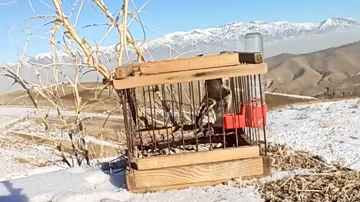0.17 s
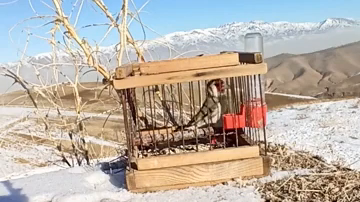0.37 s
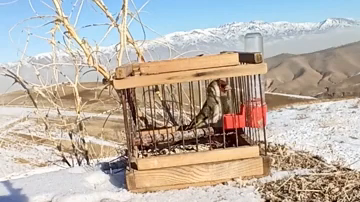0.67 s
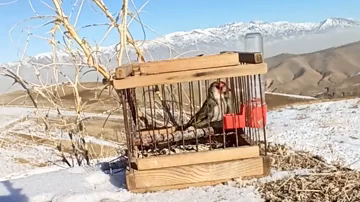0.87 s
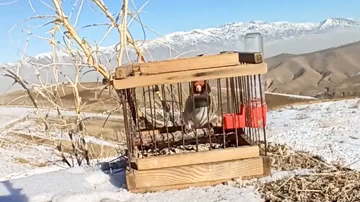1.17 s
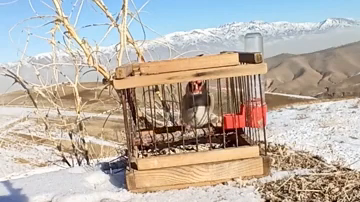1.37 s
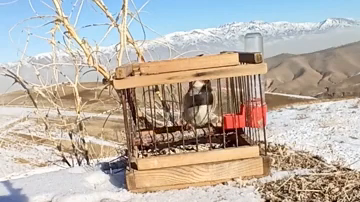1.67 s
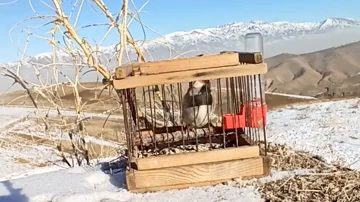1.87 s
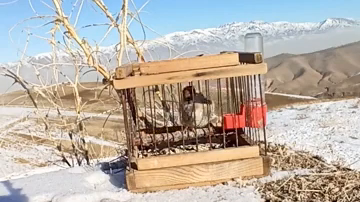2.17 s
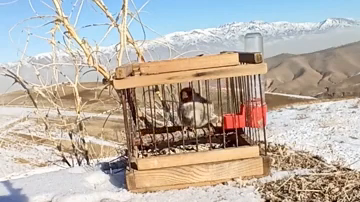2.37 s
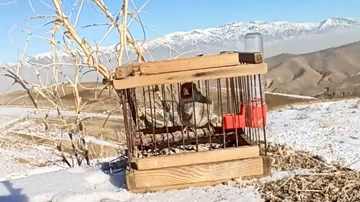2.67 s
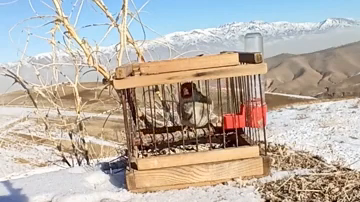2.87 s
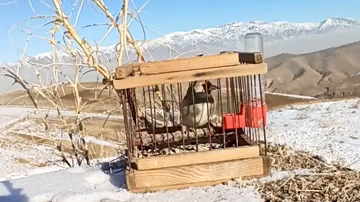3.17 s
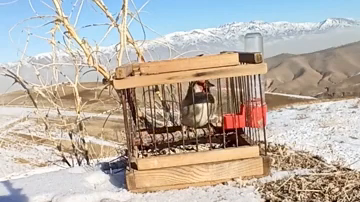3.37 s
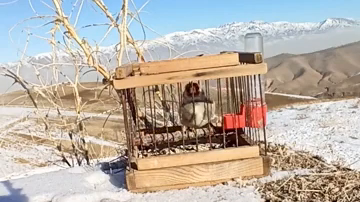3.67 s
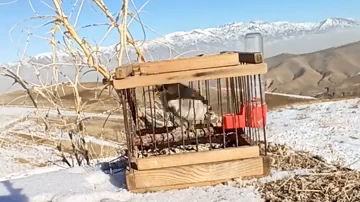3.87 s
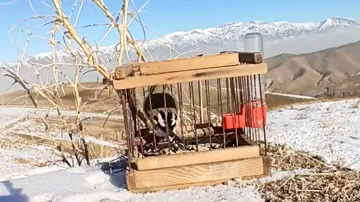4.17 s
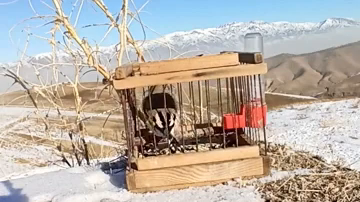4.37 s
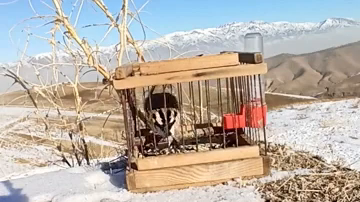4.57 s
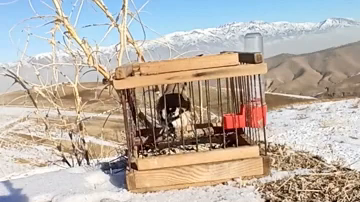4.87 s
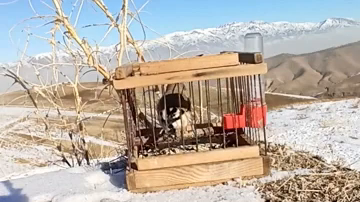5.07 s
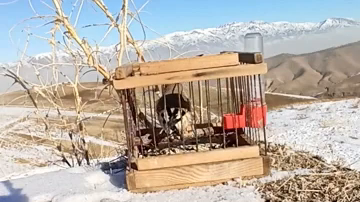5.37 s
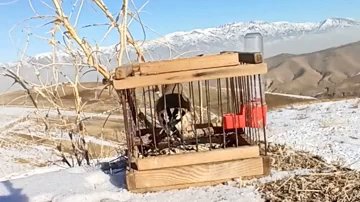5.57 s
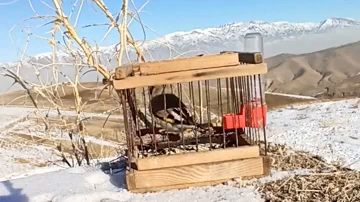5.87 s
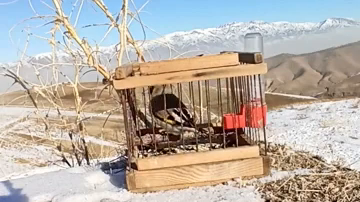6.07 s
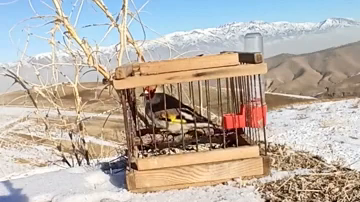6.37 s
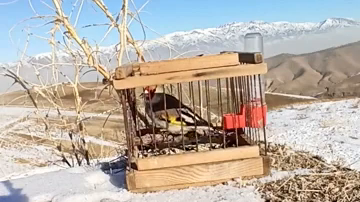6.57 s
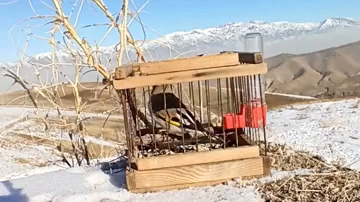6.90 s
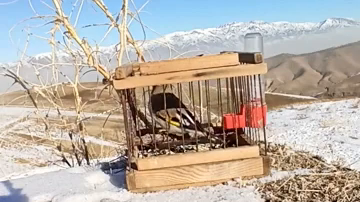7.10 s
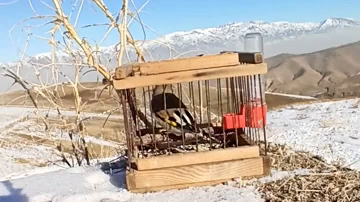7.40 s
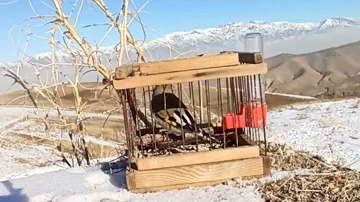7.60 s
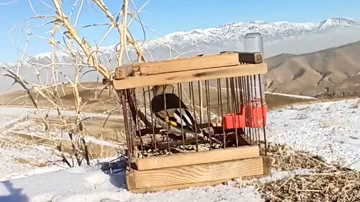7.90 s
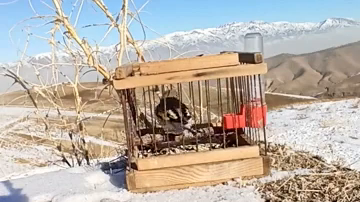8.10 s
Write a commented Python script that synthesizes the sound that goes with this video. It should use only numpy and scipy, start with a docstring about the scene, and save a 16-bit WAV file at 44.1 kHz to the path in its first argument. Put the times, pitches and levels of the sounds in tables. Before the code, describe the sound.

A small caged goldfinch gives sharp, high, falling chirps in twos and threes outdoors, with faint wire ticks, a perch thump and late wind buffets.

```python
"""A wire ticks over a low rumble and hiss: a goldfinch hops in a small wooden cage on a snowy hillside.
It chirps in twos and threes, left of a stereo microphone: both halves of its syrinx whistle at once, falling,
and couple into sum and difference tones. Wire, wood and perch sound as struck, decaying modes; feathers rustle
as band-limited noise. Far birds call faintly as gliding sines; at the end wind buffets the left port."""
import sys
import numpy as np
from scipy import signal
from scipy.fft import rfft, irfft
from scipy.io import wavfile
from scipy.ndimage import uniform_filter1d

SR = 44100
rng = np.random.default_rng(int(sys.argv[2]) if len(sys.argv) > 2 else 0)


def dump(signal):
    """Clip the signal to [-1, 1] and save it as 16-bit WAV at the path in sys.argv[1]."""
    limited = np.clip(np.atleast_2d(signal).T, -1, 1)
    pcm = np.round(limited * 32767).astype(np.int16)
    wavfile.write(sys.argv[1], SR, pcm)


N = 363384
T = np.arange(N) / SR

# Spectrum of the distant rumble: pitch_hz, relative_db (per Hz)
RUMBLE_SPECTRUM = [(18, -64), (30, -33), (97, 0.5), (321, -9), (395, -10.5), (806, -17), (896, -16.5),
                   (995, -20.5), (4500, -30.5), (5850, -60), (9900, -120)]
# Spectrum of the hiss: pitch_hz, relative_db
HISS_SPECTRUM = [(2500, -28.5), (4500, -5), (4700, -3.5), (4850, -10), (6000, -4.5), (6200, 0.5),
                 (7600, -2), (7750, -7.5), (8500, -7.5), (8750, -0.5), (11400, 2.5), (11700, -2),
                 (15400, -4.5)]
# Likeness of the background noise in left and right, by pitch: pitch_hz, correlation (0-1)
NOISE_CORRELATION = [(60, .38), (290, .22), (640, .02), (6500, .05), (7200, .9), (8500, 0.99)]
RUMBLE_DB, HISS_DB = -62, -72  # rms ahead of the rumble's wander and the final tone colour

# Course of the wind on the ports: time_s, left_db, right_db
WIND_COURSE = [(6.4, -77.5, -87), (6.9, -58.5, -79.5), (7.3, -57.5, -80), (7.45, -51.5, -75),
               (7.7, -53, -62.5), (7.95, -52.5, -66.5), (8.1, -56, -71.5), (8.24, -56.5, -66)]
# Single buffets on the left port: time_s, relative_db, pitch_hz
WIND_BUFFETS = [(7.401, -48.5, 102), (7.459, -46, 84), (7.539, -44.5, 88.8), (7.679, -44.5, 102),
                (7.759, -44.5, 121), (7.81, -47.5, 86.1), (7.999, -40, 94.8)]
# Far whistles: start_s, length_s, start_hz, end_hz, relative_db, left_minus_right_db
FAR_WHISTLES = [(2.871, 0.059, 2860, 4900, -73.5, 7), (3.582, .02, 2950, 3380, -75, 2),
                (3.713, .024, 3400, 3780, -69.5, 3), (3.715, 0.024, 3850, 4600, -73, 3),
                (3.81, .034, 3000, 3780, -71.5, 7), (0.306, 0.025, 3140, 3260, -70, 13),
                (0.38, 0.024, 3170, 3206, -72.5, 2), (6.513, .022, 3130, 3250, -77, 4)]

# Modes of a struck wire: pitch_ratio, relative_db, t60_s
WIRE_MODES = [(1, 0, .035), (.9, -15, .02), (1.03, -6, .03)]
# Modes of the wooden frame: pitch_hz, relative_db, t60_s
WOOD_MODES = [(380, 0, 0.045), (620, 6, .045), (940, 1.5, 0.012), (1250, 3.5, 0.027), (1550, 0.5, .025),
              (1950, -4.5, 0.078), (3020, -12.5, .03)]
# Claws and tail tick the wires: time_s, wire_db, wire_hz, frame_knock_db (relative strengths)
WIRE_TICKS = [(0.004, -42.5, 6830, -53), (0.216, -50, 7500, -54.5), (0.232, -58, 7600, -57.5),
              (0.295, -46, 7500, -64), (0.315, -50, 7640, -57), (0.337, -44, 6480, -51.5),
              (0.34, -55, 7420, -51.5), (0.361, -64.5, 7400, -63.5), (1.003, -42, 7470, -71),
              (1.220, -55, 7650, -60), (1.849, -56.5, 6940, -65.5), (3.848, -61.5, 7000, -58),
              (4.097, -45, 6840, -59), (4.149, -65, 7650, -54)]
# Feet land on the perch: time_s, frame_knock_db, perch_ring_db (relative strengths)
PERCH_LANDINGS = [(1.234, -58, -50.5), (4.008, -40.5, -38.5), (4.020, -48.5, -45.5), (4.030, -47.5, -42),
                  (4.125, -52.5, -70), (4.659, -61.5, -54.5)]
# Feathers brush the wires: start_s, length_s, relative_db
FEATHER_RUSTLES = [(0.23, 0.23, -69.5), (1.125, 0.19, -71.5), (4.1, 0.073, -66.5)]
PERCH_HZ, PERCH_T60_S = 801, 0.085
SCUFF_DB, SCUFF_T60_S = -4.5, 0.04
RUSTLE_EDGE_S = 0.02

# Coupling tones at m x lower + n x upper voice: m, n (whole numbers)
COUPLING_ORDERS = [(-1, 1), (-2, 2), (2, -1), (-1, 2), (2, 0), (1, 1), (0, 2), (3, 0), (3, -1), (-1, 3)]
# Strength of each coupling tone under the voices: relative_db
COUPLING_LEVELS = [-46.5, -48, -30, -35, -38, -34.5, -37, -40, -47.5, -42]
# The chirps: start_s, lower_length_s, upper_length_s,
# lower_start_hz, lower_rest_hz, upper_start_hz, upper_rest_hz, lower_top_db, upper_top_db (relative),
# lower_top_place, upper_top_place (0-1 of the note),
# cancelled_hz (one pitch that the cage reflection weakens), spacing_hz (of such pitches), reflection_share (0-1),
# lower_left_minus_right_db, upper_left_minus_right_db,
# difference_extra_db (low difference tone), sum_extra_db (high sum tones)
SONG = [(0.3972, 0.042, 0.042, 7170, 5326, 8320, 6760, -18, -22.5, 0.52, 0.43, 5983, 730, 0.14, 14.8, 10.6, 7, 8.5),
        (0.5406, 0.046, 0.05, 6150, 4770, 7330, 5850, -26, -22.5, 0.5, 0.45, 5770, 1330, 0.29, 11.6, 10.2, 11, 5.5),
        (1.2604, 0.043, 0.044, 7090, 5314, 8460, 6800, -16.5, -20, 0.55, 0.48, 6090, 753, 0.36, 12.1, 16.8, 7, -2),
        (1.4014, 0.048, 0.05, 5800, 4835, 7130, 5900, -22, -17.5, 0.37, 0.35, 5628, 464, 0.1, 8.7, 12.5, 5.5, 0.5),
        (2.0702, 0.047, 0.044, 7440, 5320, 8530, 6790, -11, -12.5, 0.43, 0.47, 5830, 1080, 0.23, 7.1, 18.1, -4, -3.5),
        (2.1901, 0.047, 0.053, 5950, 4820, 7200, 5985, -14.5, -15.5, 0.41, 0.32, 5710, 470, 0.12, 10.1, 8.7, 0.5, 3.4),
        (2.8214, 0.043, 0.048, 7240, 5320, 8390, 6830, -15, -18, 0.44, 0.39, 5780, 1114, 0.46, 12.5, 10.6, 1.5, -3),
        (3.0103, 0.044, 0.051, 5450, 4835, 6810, 6005, -18, -14.5, 0.42, 0.49, 5680, 470, 0.32, 9.9, 13.4, -7.5, -0.5),
        (3.1678, 0.05, 0.055, 5820, 4800, 7100, 6056, -20, -20, 0.41, 0.31, 6040, 480, 0.15, 13.6, 5, -7, 4.0),
        (3.8549, 0.044, 0.041, 7250, 5510, 8640, 6930, -11.5, -15.5, 0.35, 0.52, 5940, 670, 0.49, 13.1, 11.9, 5.0, 2.5),
        (3.9792, 0.053, 0.046, 6200, 4876, 7264, 6090, -21.5, -16, 0.43, 0.32, 5860, 635, 0.32, 8.9, 6.0, 6, -2.3),
        (4.167, 0.051, 0.048, 5620, 4770, 6990, 6060, -21.5, -21.85, 0.34, 0.32, 5420, 1266, 0.65, 10.4, 7.1, -1.6, -0.7),
        (5.7972, 0.041, 0.04, 6590, 5215, 8120, 6840, -19.5, -23.5, 0.36, 0.46, 5960, 717, 0.24, 14.0, 10.5, 0.5, -6),
        (5.9235, 0.047, 0.052, 5940, 4785, 7280, 5880, -26.5, -18, 0.42, 0.42, 6260, 846, 0.32, 11.0, 8.1, -1, -1.5),
        (6.5939, 0.052, 0.045, 7240, 5416, 8405, 6890, -14, -13.5, 0.26, 0.46, 5960, 978, 0.25, 9.3, 10.0, 3.5, 0),
        (6.7096, 0.052, 0.055, 6240, 4858, 7340, 6050, -20, -21, 0.52, 0.37, 6390, 865, 0.46, 10.2, 8.3, 3, -8)]
COUPLING_FLUTTER_DB, COUPLING_GROWTH = 3, 0.12  # louder notes couple more strongly
WAVER_DB = 0.8  # each voice is a little unsteady
SOFT_NOISE_DB, SIZZLE_DB = -53.5, -50  # rms ahead of the chirp's envelope
RASP_DB, RASP_HZ = -29.5, 900
OPENING_ABOVE_HZ = 6400  # a chirp whose lower voice starts above this opens a group
OPENING_LAG_S, TRAILING_LAG_S = 0.0035, 0.0017  # the upper voice joins this much later
GLIDE_S, TRAILING_UPPER_GLIDE_S = 0.014, 0.027  # time constants of the falling pitch
END_LIFT_HZ, SWELL_SHARPNESS = 108, 2.6
REFLECTION_RIGHT = 0.7  # share of the reflection that reaches the right port
LAG_S, SHADOW_LAG_S, SHADOW_SHARE = 0.00012, 0.0011, 0.28

ECHO_DB, ECHO_T60_S = -30, 0.052
# Final tone colour: pitch_hz, gain_db
TONE_COLOUR = [(8500, 0.5), (8750, -14.5), (11400, -15.5), (11700, -1), (13000, -0.5), (15300, 5.5)]
TOP_HZ = 15700


def undb(db):
    """Level to amplitude: twenty decibels are a factor of ten."""
    return 10 ** (np.asarray(db) / 20)


def level(x, db):
    """Mean power sets level: scale a signal to a given rms."""
    return x * undb(db) / np.sqrt(np.mean(x ** 2))


def response(points):
    """A spectrum interpolated over log frequency, on every frequency bin."""
    hz, value = np.transpose(points)
    bins_hz = np.arange(N // 2 + 1) * SR / N
    return np.interp(np.log(bins_hz + 1), np.log(hz), value)


def band(x, lo_hz, hi_hz):
    """Band-pass filtering: chiefly the stretch between two frequencies passes."""
    return signal.sosfilt(signal.butter(2, [lo_hz, hi_hz], "bandpass", fs=SR, output="sos"), x)


def later(x, lag_s):
    """Delay as linear phase, which allows any fraction of a sample."""
    bins_hz = np.arange(N // 2 + 1) * SR / N
    return irfft(rfft(x) * np.exp(-2j * np.pi * bins_hz * lag_s), N)


def walk(rate):
    """Slow fluctuation: noise smoothed twice over 1/rate seconds, of rms 1."""
    width = int(SR / rate)
    smooth = uniform_filter1d(rng.standard_normal(N), width)
    return level(uniform_filter1d(smooth, width), 0)


def rumble_and_hiss():
    """Partially correlated noise: rumble and hiss, wide in the middle, nearly centred in the treble."""
    like = np.clip(response(NOISE_CORRELATION), 0, 1)
    mid, side = rfft(rng.standard_normal((2, N))) * np.sqrt([1 + like, 1 - like])
    pair = np.array([mid + side, mid - side])
    rumble = level(irfft(pair * undb(response(RUMBLE_SPECTRUM)), N), RUMBLE_DB)
    rumble = rumble * undb(1.3 * walk(2.7))
    hiss = level(irfft(pair * undb(response(HISS_SPECTRUM)), N), HISS_DB)
    return rumble + hiss


def wind():
    """Turbulent pressure, unrelated at the two ports, with short low-pitched buffets on the left."""
    time_s, left_db, right_db = np.transpose(WIND_COURSE)
    out = np.zeros((2, N))
    for port, (db, hi_hz) in enumerate([(left_db, 140), (right_db, 190)]):
        turbulence = band(rng.standard_normal(N), 55, hi_hz) * undb(1.506 * walk(16))
        out[port] = level(turbulence, 0) * undb(np.interp(T, time_s, db))
    for at, db, hz in WIND_BUFFETS:
        t = T - at - 0.002
        out[0] += undb(db + 5) * np.cos(2 * np.pi * hz * t) * np.exp(-(t / 0.013) ** 2)
    return out


def far_birds():
    """Frequency-modulated tones: thin whistles glide upward, placed by level difference."""
    out = np.zeros((2, N))
    for start_s, length, from_hz, to_hz, db, pan_db in FAR_WHISTLES:
        u = np.clip((T - start_s) / length, 0, 1)
        hz = from_hz + (to_hz - from_hz) * (1 - np.cos(np.pi * u)) / 2
        swell = np.sqrt(np.sin(np.pi * u).clip(0)) * (u < 1)
        tone = np.sin(2 * np.pi * np.cumsum(hz) / SR) * swell * undb(db + 4.5)
        out += tone * undb([[pan_db / 2], [-pan_db / 2]])
    return out


def ring(modes, chance, detune=.05):
    """Modal decay: a blow excites modes, each at a chance strength, pitch and phase."""
    t = T[:SR // 5]
    total = np.zeros(len(t))
    for (hz, db, t60), (c, d) in zip(modes, chance):
        tone = np.sin(2 * np.pi * hz * (1 + detune * d) * t + c)
        total += undb(db + 4.9 * c) * tone * np.exp(-np.log(1000) * t / t60)
    return total * np.minimum(t / 0.00075, 1) / 2  # brief linear onset


def scuff(lo_hz, hi_hz):
    """Frictional noise: a dry, decaying scrape accompanies a blow."""
    t = T[:SR // 5]
    noise = level(band(rng.standard_normal(len(t)), lo_hz, hi_hz), SCUFF_DB)
    return noise * np.exp(-np.log(1000) * t / SCUFF_T60_S)


def after(start_s):
    """Time window of one blow: a fifth of a second from its onset."""
    start = int(start_s * SR)
    return slice(start, start + SR // 5)


def wire_tick(db, hz, chance):
    """Modes of a struck wire, joined by a scrape around its pitch."""
    modes = [(hz * ratio, mode_db, t60) for ratio, mode_db, t60 in WIRE_MODES]
    return undb(db) * (ring(modes, chance * .4, .02) + scuff(.94 * hz, 1.05 * hz) / 2)


def wood_knock(db, chance):
    """Modes of the struck wooden frame, joined by a scrape."""
    return undb(db) * (ring(WOOD_MODES, chance) / 2 + scuff(450, 1400))


def rustle():
    """Granular friction: fluctuating narrow-band noise as feathers brush the wires."""
    grains = band(rng.standard_normal(N), 7100, 7900) * undb(4.5 * walk(120))
    envelope = np.zeros(N)
    for start_s, length, db in FEATHER_RUSTLES:
        inside_s = np.minimum(T - start_s, start_s + length - T)
        envelope += undb(db) * np.clip(inside_s / RUSTLE_EDGE_S + 1, 0, 1)
    return level(grains, 0) * envelope


def cage():
    """Impact and friction: wire ticks, wood knocks, perch rings and rustles, placed by level difference."""
    wire, wood = np.zeros(N), np.zeros(N)
    chances = rng.standard_normal((len(WIRE_TICKS), len(WIRE_MODES) + len(WOOD_MODES), 2))
    for (time_s, wire_db, wire_hz, wood_db), chance in zip(WIRE_TICKS, chances):
        wire[after(time_s)] += wire_tick(wire_db, wire_hz, chance)
        wood[after(time_s)] += wood_knock(wood_db, chance[len(WIRE_MODES):])
    chances = rng.standard_normal((len(PERCH_LANDINGS), len(WOOD_MODES), 2))
    for (time_s, wood_db, perch_db), chance in zip(PERCH_LANDINGS, chances):
        perch = ring([(PERCH_HZ, perch_db, PERCH_T60_S)], chance * .2, .02)
        wood[after(time_s)] += wood_knock(wood_db, chance) + perch
    wire += rustle()
    return wire * undb([[4.0], [-9.0]]) + wood * undb([[3.0], [0.5]])


def voice(t, length, from_hz, to_hz, glide, db, top):
    """Relaxation of one syrinx half: size, pitch and phase as it swells, fades, falls and lifts at the end."""
    u, top = np.clip(t / length, 0, 1), np.clip(top, .1, .9)
    fall = (from_hz - to_hz) * np.exp(-np.maximum(t, 0) / glide)
    hz = to_hz + fall + END_LIFT_HZ * u ** 8
    swell = (u / top) ** top * ((1 - u) / (1 - top)) ** (1 - top)
    size = undb(db) * swell ** SWELL_SHARPNESS
    return np.sqrt(2) * size, hz, 2 * np.pi * np.cumsum(hz) / SR


def reflected(size, hz, phase, share, dip_hz, gap_hz):
    """Interference: the cage reflection weakens evenly spaced pitches of a voice."""
    return size * (np.cos(phase) - share * np.cos(phase - 2 * np.pi * (hz - dip_hz) / gap_hz))


def coupling(low, high, flutter, difference_db, sum_db):
    """Nonlinear mixing: two voices produce fluttering combination tones, stronger in louder notes."""
    (low_size, _, low_phase), (high_size, _, high_phase) = low, high
    strain = (np.hypot(low_size, high_size) / 0.081) ** COUPLING_GROWTH
    total = 0
    for (m, n), db, wobble in zip(COUPLING_ORDERS, COUPLING_LEVELS, flutter):
        extra_db = difference_db if (m, n) == (-1, 1) else sum_db * (m + n > 1)
        # weighted geometric mean of the two voices
        size = (low_size ** abs(m) * high_size ** abs(n)) ** (1 / (abs(m) + abs(n)))
        gain = undb(db + extra_db) * wobble * strain
        total = total + gain * size * np.cos(m * low_phase + n * high_phase)
    return total


def goldfinch():
    """Two coupled oscillators with rasp and soft noise; the right port lies in the sound shadow."""
    left, right = np.zeros(N), np.zeros(N)
    rasp = 1 + level(band(rng.standard_normal(N), 60, RASP_HZ), RASP_DB)
    flutter = [undb(COUPLING_FLUTTER_DB * walk(170)) for _ in COUPLING_ORDERS]
    low_waver, high_waver = [undb(WAVER_DB * walk(360)) for _ in range(2)]
    soft_noise = level(band(rng.standard_normal(N), 3400, 5900), SOFT_NOISE_DB)
    soft_noise += level(band(rng.standard_normal(N), 11000, 16000), SIZZLE_DB)
    for (start_s, low_s, high_s, low_hz, low_rest_hz, high_hz, high_rest_hz, low_db, high_db, low_top, high_top,
         dip_hz, gap_hz, share, low_pan_db, high_pan_db, difference_db, sum_db) in SONG:
        span = slice(int((start_s - .01) * SR), int((start_s + .07) * SR))
        lag, high_glide = TRAILING_LAG_S, TRAILING_UPPER_GLIDE_S
        if low_hz > OPENING_ABOVE_HZ:
            lag, high_glide = OPENING_LAG_S, GLIDE_S
        t = T[span] - start_s
        size, hz, phase = voice(t, low_s, low_hz, low_rest_hz, GLIDE_S, low_db, low_top)
        low = size * low_waver[span], hz, phase
        size, hz, phase = voice(t - lag, high_s, high_hz, high_rest_hz, high_glide, high_db, high_top)
        high = size * high_waver[span], hz, phase
        # a smoothed envelope for the soft noise around each chirp
        envelope = np.sqrt(np.abs(uniform_filter1d(np.hypot(low[0], high[0]), size=500)))
        mix = envelope * soft_noise[span]
        mix = mix + coupling(low, high, [f[span] for f in flutter], difference_db, sum_db)
        left[span] += reflected(*low, share, dip_hz, gap_hz) + reflected(*high, share, dip_hz, gap_hz) + mix
        right_share = REFLECTION_RIGHT * share
        right[span] += reflected(*low, right_share, dip_hz, gap_hz) * undb(-low_pan_db)
        right[span] += reflected(*high, right_share, dip_hz, gap_hz) * undb(-high_pan_db)
        right[span] += mix * undb(-11.0)
    # two ways round the housing
    right = later(right, LAG_S) + SHADOW_SHARE * later(right, SHADOW_LAG_S)
    return np.array([left, right]) * rasp


def scatter(near):
    """Diffuse reflection: bars and ground return the left signal as a brief decaying tail in both ports."""
    t = T[:SR // 8]
    tail = rng.standard_normal((2, len(t))) * 1000. ** (-t / ECHO_T60_S)
    tail = tail / np.sqrt(np.sum(tail[0] ** 2))
    echo = signal.fftconvolve(near[:1], tail, axes=1)[:, :N]
    return echo * undb([[ECHO_DB], [ECHO_DB - 3.5]])


def scene():
    """Superposition: rumble and hiss, wind and far birds behind the cage, its bird and their scatter."""
    background = rumble_and_hiss() + wind() + far_birds()
    near = cage() + goldfinch()
    return background + near + scatter(near)


def record(dry):
    """Linear filtering: a deep dip in the upper treble, a lift above it; the top is cut."""
    coloured = irfft(rfft(dry) * undb(response(TONE_COLOUR)), N)
    return signal.sosfilt(signal.ellip(10, .2, 60, TOP_HZ, fs=SR, output="sos"), coloured)


dry = scene()
out = record(dry)
dump(out)
```